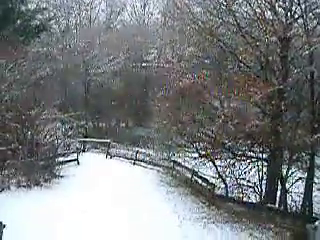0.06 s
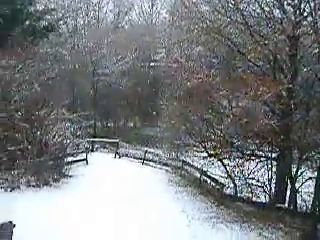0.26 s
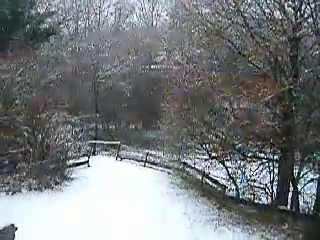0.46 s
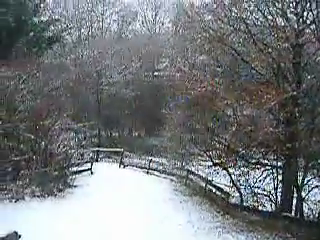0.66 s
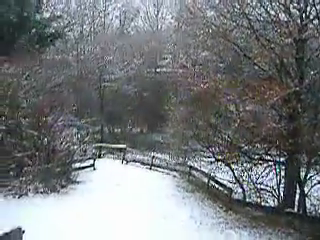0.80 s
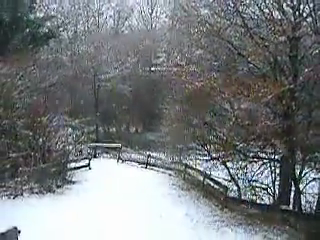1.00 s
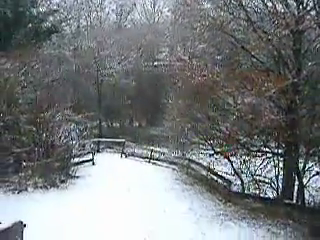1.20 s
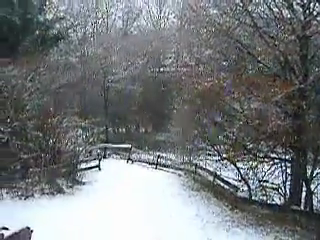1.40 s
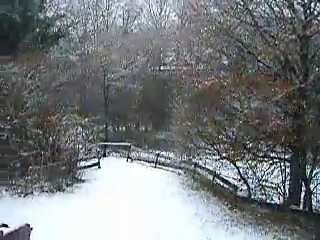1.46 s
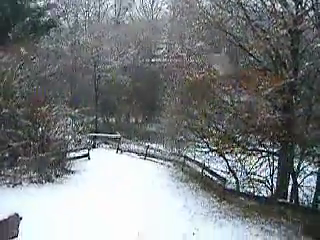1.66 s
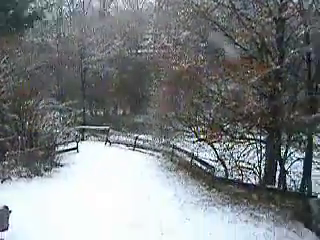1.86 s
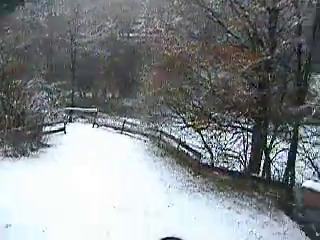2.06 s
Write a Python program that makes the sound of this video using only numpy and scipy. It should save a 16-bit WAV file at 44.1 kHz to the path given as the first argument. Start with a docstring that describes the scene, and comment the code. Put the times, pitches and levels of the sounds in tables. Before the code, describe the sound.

Very close handling knocks on a small hollow casing, dry and without echo. Near silence until 0.2 s, then a rapid uneven cluster with squeaky scrapes, a heavy ringing blow at 0.3, and knocks thinning by 0.75. A strong, bright knock rings at 1.02, another heavy one at 1.55; clicks and rubs crowd 1.68-1.87. Faint hiss, whine and low rumble lie behind, swelling slightly at the end.

```python
"""Handling a camera outdoors

Close knocks, clicks and short scrapes of handling on the camera's casing, outdoors.
Each knock is a contact crack plus decaying modes of the casing; heavy ones leave a short low ring.
Scrapes are clumps of tiny slips coloured by the casing; small loose parts ping.
No echo: behind lie only quiet air, a low rumble, a late low tone and the recorder's faint whine."""
import sys
import numpy as np
from scipy import signal
from scipy.io import wavfile

SR = 44100
rng = np.random.default_rng(int(sys.argv[2]) if len(sys.argv) > 2 else 0)


def generate_wav(signal):
    """Clip the signal to [-1, 1] and save it as 16-bit WAV at the path in sys.argv[1]."""
    frames = np.transpose(np.atleast_2d(signal))
    scaled = np.clip(frames, -1, 1) * 32767
    pcm = np.round(scaled).astype(np.int16)
    wavfile.write(sys.argv[1], SR, pcm)


N = 92610
TIME_S = np.arange(N) / SR


def gain(db):
    """Turn decibels into an amplitude factor."""
    return 10 ** (np.asarray(db) / 20)


def evened(x):
    """Bring a sound to an RMS of one."""
    return x / np.sqrt(np.mean(x ** 2) + 1e-20)


def add(mix, start_s, sound):
    """Lay a sound into the mix from its start time, cut at the end of the mix."""
    part = mix[max(round(start_s * SR), 0):][:len(sound)]
    part += sound[:len(part)]


def colour(x, curve):
    """Causal minimum-phase filter that follows a curve of f/Hz, level/dB."""
    hz, db = np.transpose(curve)
    f = np.abs(np.fft.fftfreq(4096, 1 / SR))
    log_gain = np.log(gain(np.interp(np.log(f + 1), np.log(hz), db)))
    spectrum = np.exp(np.conj(signal.hilbert(log_gain)))
    taps = np.fft.ifft(spectrum).real[:len(f) // 2]
    return signal.fftconvolve(x, taps)[:len(x)]


def noise_bed(curve, level):
    """Steady coloured noise whose level follows breakpoints in dB."""
    noise = evened(colour(rng.standard_normal(N), curve))
    return gain(np.interp(TIME_S, *np.transpose(level))) * noise


# colour of the outdoor hiss [f/Hz, relative level/dB]
AIR_COLOUR = [(20, 7.5), (45, -9), (70, -2.5), (130, -28), (230, -6.5), (400, -14), (850, -13), (1300, -15),
              (1900, -15), (2500, -20), (3600, -22.5), (6800, -23), (7900, -23.5), (9000, -34)]
# fader of the hiss [t/s, level/dB]
AIR_LEVEL = [(0, -47), (.7, -44), (1.2, -45.5), (2.1, -43.5)]


def air():
    """Quiet outdoor hiss: filtered noise, a little stronger toward the end than at the start."""
    return noise_bed(AIR_COLOUR, AIR_LEVEL)


# colour of the rumble [f/Hz, relative level/dB]
RUMBLE_COLOUR = [(15, -2.5), (45, 3.5), (90, 0), (150, -5), (220, -7), (400, -12.5), (900, -12),
                 (3000, -77.5)]
# fader of the rumble [t/s, level/dB]
RUMBLE_LEVEL = [(0, -47), (.4, -48), (.7, -51), (1.15, -47), (1.35, -47), (1.7, -46), (2.1, -42)]


def rumble():
    """Low rumble on the microphone: bass-heavy noise that swells at the end."""
    return noise_bed(RUMBLE_COLOUR, RUMBLE_LEVEL)


# glide of the faint low tone [t/s, f/Hz, level/dB]
LOW_TONE = [(1.87, 224, -51), (1.95, 207.6, -43.5), (2.03, 195, -58)]


def low_tone():
    """A faint sine sinks in pitch under the rumble at the end."""
    s, hz, db = np.transpose(LOW_TONE)
    phase = 2 * np.pi * np.cumsum(np.interp(TIME_S, s, hz)) / SR
    return np.interp(TIME_S, s, gain(db), left=0) * np.sin(phase)


CONTACT_RISE_S = 0.00016


def ring(modes, rise_s=CONTACT_RISE_S, scatter_db=0, order=1):
    """Modes as sines that build up (softer with a higher order) and die; the place struck shifts their levels."""
    t = np.arange(SR // 2) / SR
    sines = np.zeros(len(t))
    for hz, db, t60 in modes:
        strength = gain(db + scatter_db * rng.standard_normal())
        sines += strength * np.exp(-np.log(1000) * t / t60) * np.sin(2 * np.pi * hz * t)
    return (1 - np.exp(-t / rise_s)) ** order * sines


LEVEL_SPAN_S = 0.011  # a burst's dB is its RMS if all its energy fell within this span
FIRST_PULSE_DB = 0  # sharp pulse against the whole energy of the chatter


def burst(curve, t60, db):
    """One sharp pulse and a few milliseconds of chatter, coloured by the parts that meet."""
    t = np.arange(SR // 20) / SR
    chatter = rng.choice([-1., 1.], len(t))
    force = chatter * (1 - np.exp(-t / CONTACT_RISE_S)) * np.exp(-np.log(1000) * t / t60)
    force[round(CONTACT_RISE_S * SR)] = gain(FIRST_PULSE_DB) * np.linalg.norm(force)
    x = colour(force, curve)
    return gain(db) * x * np.sqrt(LEVEL_SPAN_S * SR / np.sum(x ** 2))


# colour of the bright tick, also the hiss of the scrapes [f/Hz, relative level/dB]
TICK_COLOUR = [(800, -5.5), (2200, -23), (3200, 0), (4800, -1), (5600, 0), (6500, -4), (7400, 2.5),
               (8200, -5), (9000, -5.5)]
THUD_T60_S, CRACK_T60_S, TICK_T60_S = 0.015, 0.017, 0.0025  # decay of the chatter


def contact(thud_colour, crack_colour, thud_db, crack_db, tick_db):
    """Two hard parts meet: a low push, a crack and a bright tick."""
    thud = burst(thud_colour, THUD_T60_S, thud_db)
    crack = burst(crack_colour, CRACK_T60_S, crack_db)
    tick = burst(TICK_COLOUR, TICK_T60_S, tick_db)
    return thud + crack + tick


GRAINS_PER_S, GRAIN_SPREAD_DB = 7000, 1.8
CLUMPS_PER_S, CLUMP_S, CLUMP_DB = 190, .0018, 5.5  # each release lifts the slips, then the lift fades


def slips():
    """Random tiny slips, plain and clumped: the contact sticks and lets go unevenly."""
    happens = rng.random(N) < GRAINS_PER_S / SR
    strength = gain(GRAIN_SPREAD_DB * np.minimum(rng.exponential(1, N), 3))
    plain = rng.standard_normal(N) * happens * strength
    released = rng.random(N) < CLUMPS_PER_S / SR
    since_release_s = TIME_S - np.maximum.accumulate(TIME_S * released)
    return plain, plain * gain(CLUMP_DB * np.exp(-since_release_s / CLUMP_S))


# rubbing strokes [peak t/s, rise t/s, fall t/s, rasp level/dB, grit level/dB, hiss level/dB,
# squeak level/dB, squeak f/Hz]
SCRAPES = [(.224, 0.014, 0.037, -34.5, -44.5, -65, -30, 1750),
           (.274, 0.035, 0.047, -41.5, -50.5, -55, -38.5, 1600),
           (0.618, 0.015, 0.032, -38.5, -39, -48, -45.5, 2020),
           (.638, 0.0044, 0.003, -40, -47, -48, -59, 2040), (0.791, 0.11, 0.019, -47, -61, -54, -57, 1700),
           (.83, 0.043, 0.032, -41, -50, -43, -50.5, 1620),
           (0.952, 0.09, 0.045, -48, -54, -50, -47.5, 1660),
           (1.695, 0.034, 0.013, -40, -60, -59, -44.5, 1650),
           (1.722, 0.017, 0.031, -36, -47.5, -43.5, -41, 1643),
           (1.793, 0.04, 0.0074, -47, -65, -56.5, -49.5, 1700),
           (1.868, 0.006, 0.0049, -54, -72, -67, -41, 1750)]
# colour of the mid rasp [f/Hz, relative level/dB]
RASP_COLOUR = [(150, -28), (450, -2.5), (530, 4.5), (590, -4.5), (700, 0), (805, 5.5), (950, 8),
               (1150, -15), (1400, -23), (1700, -6), (2100, -4.5), (2600, -9), (4000, -15), (8000, -34.5)]
# colour of the brighter grit [f/Hz, relative level/dB]
GRIT_COLOUR = [(900, -11.5), (1900, -5.5), (2500, -3), (2900, -5.5), (3130, 0), (3550, -17), (4000, -4.5),
               (4400, -9.5), (8000, -27.5)]
SQUEAK_WIDTH_HZ = 410  # of each of two passes


def scrapes():
    """Slips sound through the casing as rasp, grit, hiss and a squeak whose pitch is set per stroke."""
    out = np.zeros(N)
    plain, clumped = slips()
    rasp, grit = evened(colour(clumped, RASP_COLOUR)), evened(colour(clumped, GRIT_COLOUR))
    hiss = evened(colour(plain, TICK_COLOUR))
    for s, rise, fall, rasp_db, grit_db, hiss_db, squeak_db, squeak_hz in SCRAPES:
        stroke = np.exp(-((TIME_S - s) / np.where(TIME_S < s, rise, fall)) ** 2)
        resonance = signal.iirpeak(squeak_hz, squeak_hz / SQUEAK_WIDTH_HZ, SR)
        once = signal.lfilter(*resonance, clumped)
        squeak = evened(signal.lfilter(*resonance, once))
        rubbing = gain(rasp_db) * rasp + gain(grit_db) * grit + gain(hiss_db) * hiss
        out += stroke * (rubbing + gain(squeak_db) * squeak)
    return out


# small loose parts, jolted or rubbed [t/s, f/Hz, level/dB, t60/s]
PINGS = [(.2150, 1630, -24, .025), (0.2497, 1666, -18.5, 0.062), (0.2508, 2900, -27, 0.055),
         (0.2507, 7070, -22, .014), (.2675, 1910, -31, .035), (.447, 2930, -30.5, 0.053),
         (.4484, 6700, -27, 0.0079), (0.6112, 1990, -31, 0.044), (0.6194, 3080, -32, .05),
         (0.6895, 4100, -34, 0.019), (1.02, 3025, -30, 0.072), (1.0208, 5190, -35.5, 0.077),
         (1.6325, 4310, -41, .03), (1.6935, 1672, -27.5, 0.051), (1.7140, 880, -30, 0.03),
         (1.7863, 1095, -31.5, 0.049)]


def pings():
    """Each small loose part rings as a single decaying mode."""
    out = np.zeros(N)
    for s, hz, db, t60 in PINGS:
        add(out, s, ring([(hz, db, t60)]))
    return out


# dry contacts [t/s, thud level/dB, crack level/dB, tick level/dB]
CLICKS = [(0.6759, -39.5, -34, -31.5), (0.6802, -35, -33, -37), (0.6887, -46, -32.5, -35),
          (1.598, -58, -45.5, -42.5), (1.6821, -56, -45, -57), (1.7088, -39.5, -49, -50),
          (1.7150, -33.5, -44, -50), (1.7212, -30, -36.5, -50), (1.7271, -36.5, -34.5, -34),
          (1.7437, -31, -40, -57), (1.7477, -38, -30, -33), (1.7540, -55, -45, -33),
          (1.757, -28, -24.5, -30.5), (1.7868, -43, -43.5, -45.5)]
# colour of a click's low push [f/Hz, relative level/dB]
CLICK_THUD_COLOUR = [(40, -7), (130, -8.5), (320, -4), (550, -3), (850, 6), (1200, -12.5), (2500, -33)]
# colour of a click's crack [f/Hz, relative level/dB]
CLICK_CRACK_COLOUR = [(500, -17.5), (1200, -5), (1600, -2.5), (2250, -2), (2700, -9), (4000, -10.5),
                      (9000, -33.5)]


def clicks():
    """Dry contacts that do not set the casing ringing."""
    out = np.zeros(N)
    for s, *levels_db in CLICKS:
        add(out, s, contact(CLICK_THUD_COLOUR, CLICK_CRACK_COLOUR, *levels_db))
    return out


# low thumps [t/s, level/dB]
THUMPS = [(0.304, -30), (1.5470, -28), (1.7425, -38.5)]
# colour of a thump [f/Hz, relative level/dB]
THUMP_COLOUR = [(20, 0), (50, -4), (100, -5.5), (200, -8.5), (400, -12.5), (1000, -50)]
THUMP_T60_S = 0.023


def thumps():
    """Short low bursts under two heavy blows and one dry click."""
    out = np.zeros(N)
    for s, db in THUMPS:
        add(out, s, burst(THUMP_COLOUR, THUMP_T60_S, db))
    return out


# fundamental of the long ring, a little lower for later blows [t/s, f/Hz]
RING_HZ = [(1.1, 527.6), (1.5, 521.5)]
# upper modes of the long ring [f/Hz, relative level/dB, t60/s]
RING_UPPER = [(1201, -27, 0.16), (1945, -22.5, 0.16)]
RING_DB, RING_T60_S, RING_RISE_S = -2.08, 0.18, .009  # fundamental's relative level and decay; bloom


def long_ring(struck_s):
    """The casing's low ring, which blooms slowly after a blow."""
    fundamental = (np.interp(struck_s, *np.transpose(RING_HZ)), RING_DB, RING_T60_S)
    return ring([fundamental] + RING_UPPER, RING_RISE_S, order=2)


# blows on the casing [t/s, thud level/dB, ring level/dB, knock level/dB, knock f/Hz, body level/dB,
# overtones level/dB, crack level/dB, tick level/dB]; ring, body and overtones scale their mode tables
KNOCKS = [ (0.2207, -60, -24, -13.5, 819, -35, -28, -27.5, -22),
          (0.2273, -53, -36.5, -40, 770, -37, -28.5, -27.5, -58),
          (0.25, -50, -56, -30, 840, -44, -27, -34.5, -35.5),
          (0.3028, -25, -7, -23.5, 750, -6, -15, -18.5, -36.5),
          (.3219, -51, -20, -10, 805, -36, -44, -29.5, -34.5),
          (0.3383, -48, -24, -13.5, 788, -28, -33, -25, -33.5),
          (.3560, -42, -27, -13, 750, -26, -35, -28, -31.5),
          (0.4088, -34.5, -18.5, -8.5, 785, -27, -33, -27, -27),
          (0.4415, -37, -35, -10, 774, -31, -26.5, -33, -40),
          (.4888, -64, -30.5, -15.5, 802, -26.5, -34, -32.5, -57),
          (0.5318, -62, -45, -27, 815, -35, -50, -52, -66),
          (.5970, -48, -27.5, -14, 783, -39, -22.5, -30, -24),
          (0.751, -55, -29, -25, 800, -29.5, -33.5, -41.5, -58),
          (1.0198, -34, -6, -12, 885, -12.5, -14, -16, -21),
          (1.1173, -53, -63, -30.5, 854, -30, -63, -43, -49),
          (1.3333, -68, -46, -36.5, 965, -36.5, -42.5, -41.5, -51),
          (1.4926, -49, -35, -16, 796, -29, -36.5, -31, -70),
          (1.509, -61, -57, -29, 890, -31.5, -30.5, -31.5, -44.5),
          (1.5480, -36, -6.5, -10, 815, -6.5, -20.5, -18.5, -33.5),
          (1.6331, -52, -69.5, -30.5, 864, -44, -40.5, -43, -47.5),
          (1.8421, -25.5, -38, -20.5, 854, -20.5, -28, -33, -23)]
# colour of a knock's low push [f/Hz, relative level/dB]
THUD_COLOUR = [(30, -26.5), (90, -13.5), (300, -3), (600, -11.5), (1000, -23.5), (2500, -16.5)]
# colour of a knock's crack [f/Hz, relative level/dB]
CRACK_COLOUR = [(300, -35), (700, 6.5), (1200, 0), (1700, 2.5), (2200, -5), (2700, -7), (3500, -17),
                (6000, -17.5), (9000, -48)]
# modes of the body [f/Hz, relative level/dB, t60/s]
BODY = [(460, -18.5, 0.14), (662.6, -9, 0.11), (766.4, -7, 0.051), (1002, -20, 0.12)]
# short overtones of the body [f/Hz, relative level/dB, t60/s]
OVERTONES = [(1195, -5.5, 0.055), (1434, -17, 0.072), (1600, -4.5, 0.036), (1720, -2.5, 0.05),
             (2010, -5.5, 0.04), (2470, -16.5, 0.028), (3220, -19.5, 0.044)]
BODY_RISE_S, OVERTONE_RISE_S = 0.00057, 0.0005
PLACE_DB = 1.0  # spread of the mode levels with the place struck
KNOCK_T60_S = 0.031
FREE_T60_S = 0.062  # added, scaled by the ring, for blows that rebound and leave the casing free


def knocks():
    """Each blow cracks, knocks at a pitch of the place struck, and sets body, overtones and long ring going."""
    out = np.zeros(N)
    for s, thud_db, ring_db, knock_db, knock_hz, body_db, over_db, crack_db, tick_db in KNOCKS:
        knock_t60 = KNOCK_T60_S + FREE_T60_S * gain(ring_db)
        add(out, s, contact(THUD_COLOUR, CRACK_COLOUR, thud_db, crack_db, tick_db))
        add(out, s, gain(ring_db) * long_ring(s))
        add(out, s, ring([(knock_hz, knock_db, knock_t60)], BODY_RISE_S))
        add(out, s, gain(body_db) * ring(BODY, BODY_RISE_S, PLACE_DB))
        add(out, s, gain(over_db) * ring(OVERTONES, OVERTONE_RISE_S, PLACE_DB))
    return out


def scene():
    """Mix the layers from background to foreground, in mono."""
    background = air() + rumble() + low_tone()
    handling = scrapes() + pings() + clicks()
    return (background + handling + thumps() + knocks())[None]


# steady tones of the whine [f/Hz, RMS level/dB]
WHINE = [(7887, -63), (8113, -66)]
EDGE_HZ = 8450  # top of the passband


def record(dry):
    """The recorder rounds off the highest peaks, adds a faint whine and cuts the top."""
    whine = np.zeros(N)
    for hz, db in WHINE:
        whine += np.sqrt(2) * gain(db) * np.sin(2 * np.pi * hz * TIME_S)
    rounded = dry / (1 + (dry / .75) ** 4) ** .25  # approaches a ceiling of 0.75
    taps = signal.firwin(161, EDGE_HZ, window=("kaiser", 7), fs=SR)
    return signal.oaconvolve(rounded + whine, taps[None], "same")


dry = scene()
out = record(dry)
generate_wav(out)
```